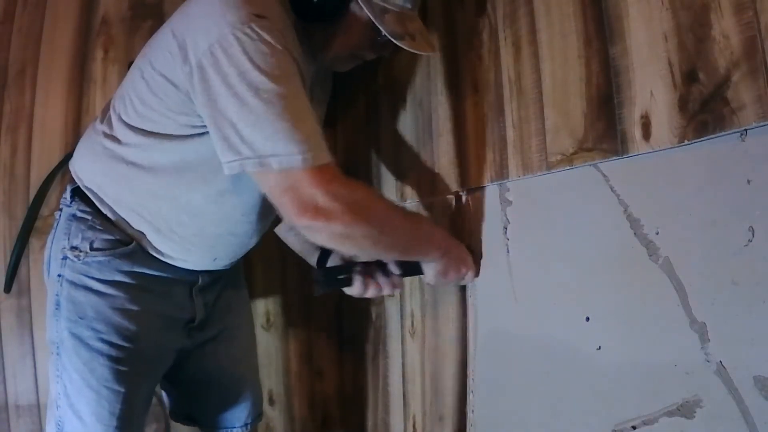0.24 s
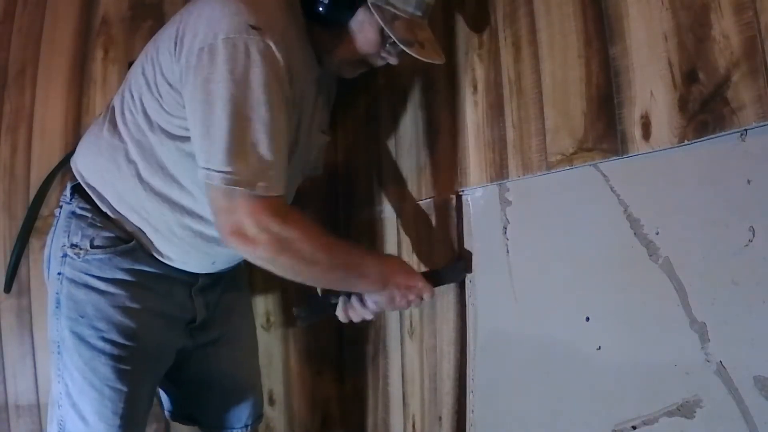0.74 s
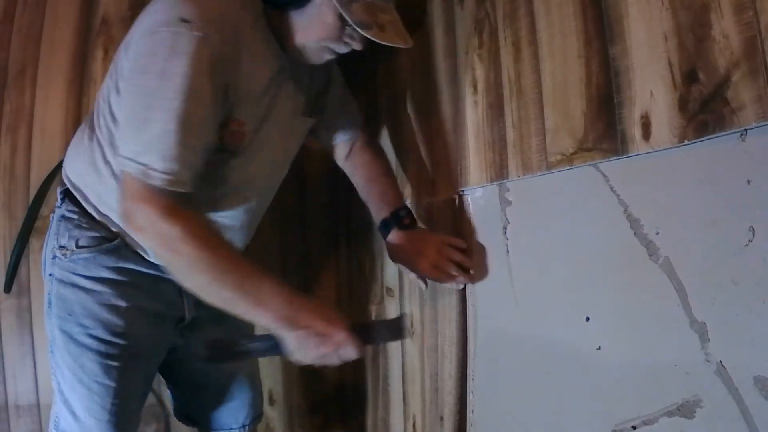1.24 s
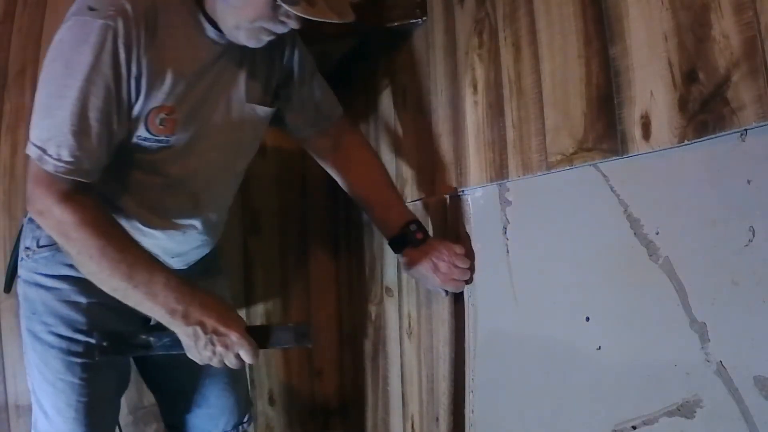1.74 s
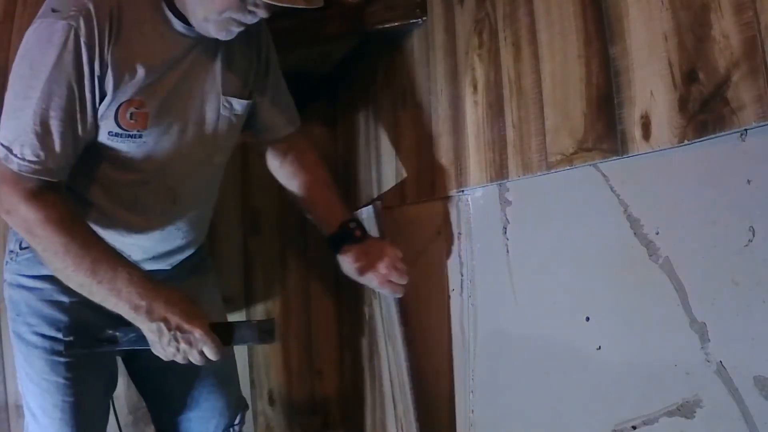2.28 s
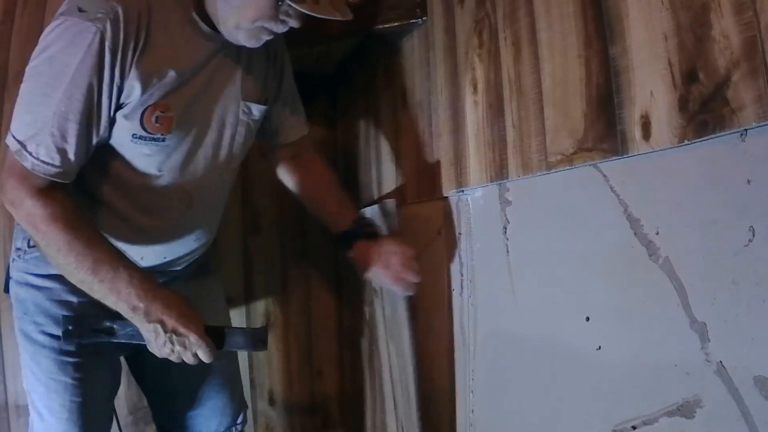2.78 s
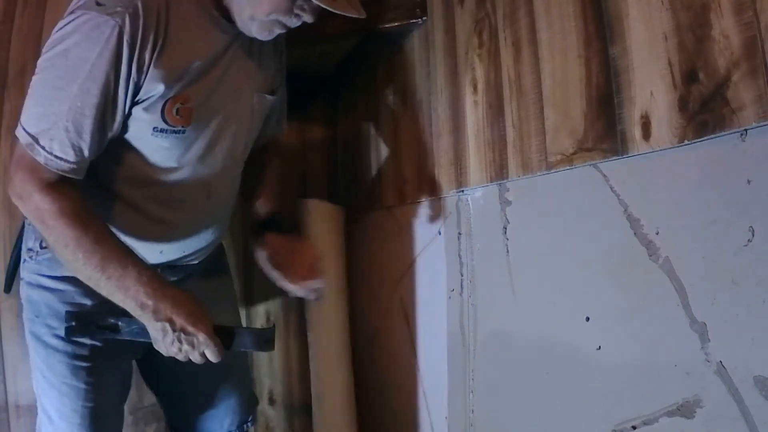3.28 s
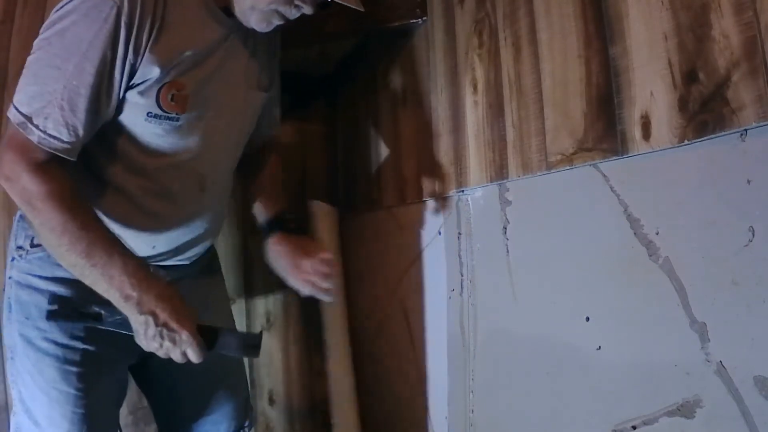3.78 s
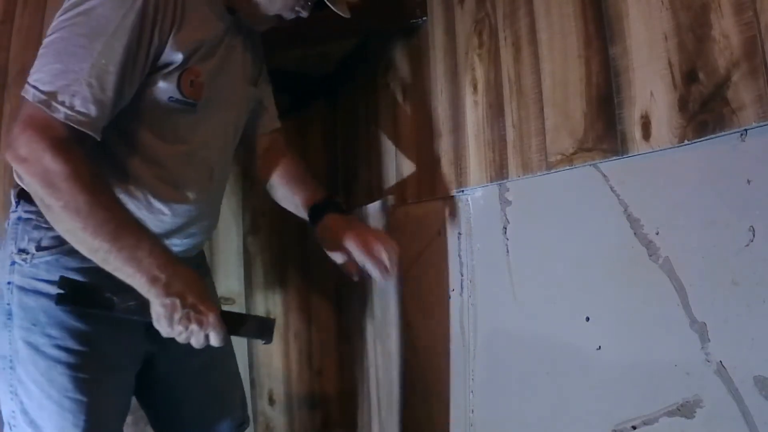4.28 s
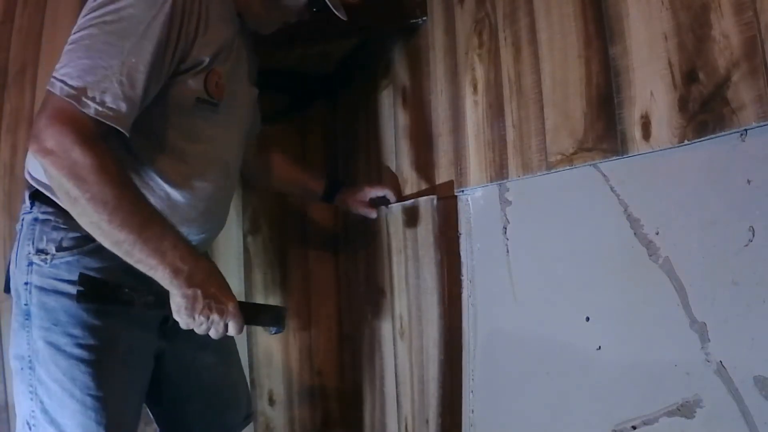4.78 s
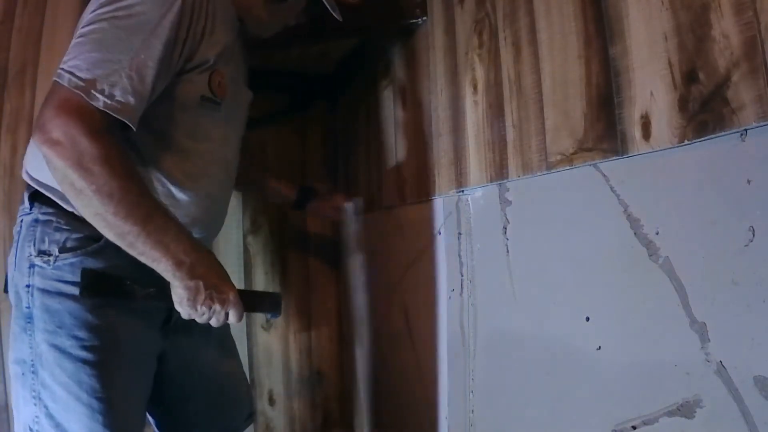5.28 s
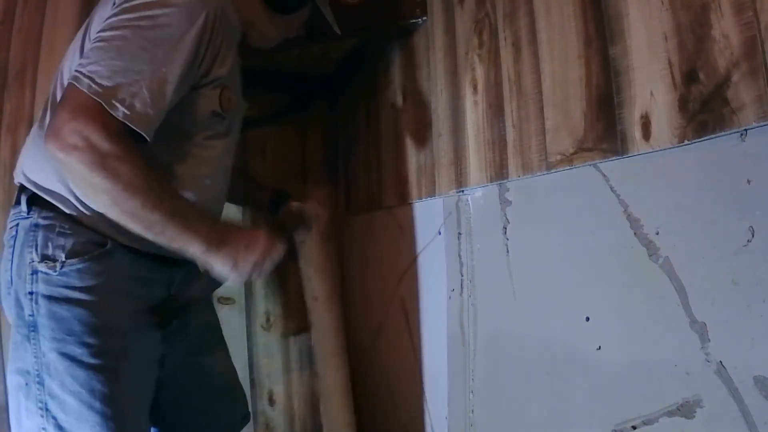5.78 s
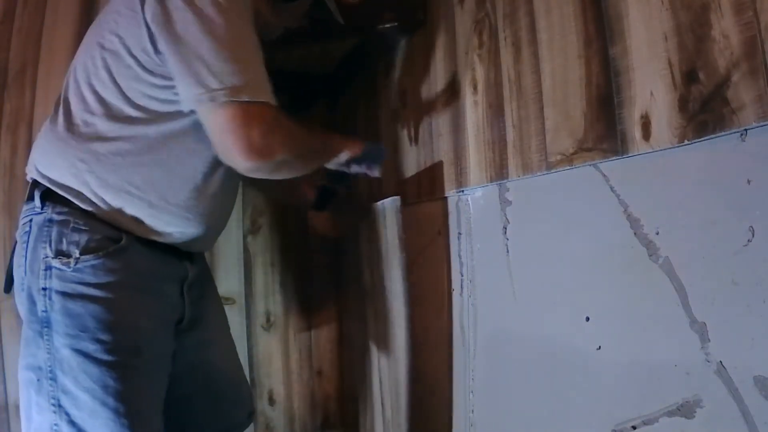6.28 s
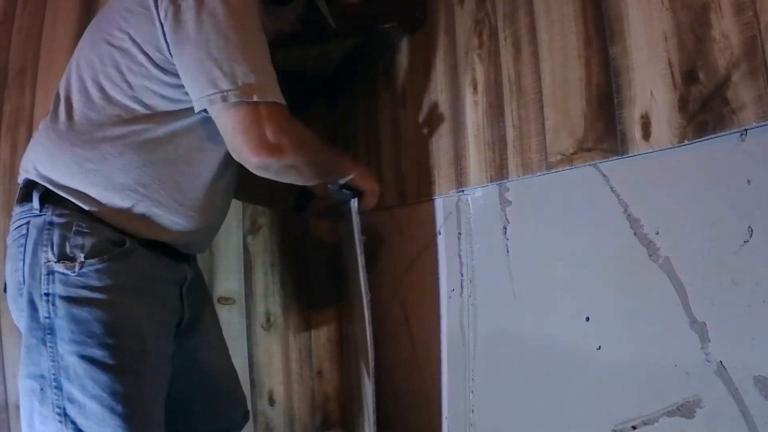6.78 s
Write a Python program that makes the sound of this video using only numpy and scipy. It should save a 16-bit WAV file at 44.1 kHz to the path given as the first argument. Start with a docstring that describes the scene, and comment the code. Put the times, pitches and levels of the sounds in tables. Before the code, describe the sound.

Drywall and a wooden strip are pried off a basement wall: sharp cracks, two huge hollow booms, then knocks, ticks and faint scrapes.

```python
"""A sheet of drywall and its wooden strip are levered, then pulled by hand, off a basement wall.
Each time a nail or the gypsum gives way, decaying bending modes boom and banded noise cracks in a small room.
The sheet also rattles, knocks and crunches, and the wood snaps: the same board, wood and sheet, struck differently.
Between pulls the edge scrapes (trains of tiny slips), grit clicks (noise bursts) and a steel bar rings (modes).
Quiet room noise lies below; the hardest cracks overload the microphone."""
import sys
import numpy as np
from scipy import signal
from scipy.fft import rfft, irfft
from scipy.io import wavfile

SR = 44100
rng = np.random.default_rng(int(sys.argv[2]) if len(sys.argv) > 2 else 0)


def waveform_to_disk(signal):
    """Save audio, clipped to [-1, 1], as 16-bit WAV at the path in sys.argv[1]."""
    frames = np.transpose(np.atleast_2d(signal))
    scaled = np.clip(frames, -1, 1) * 32767
    samples = np.round(scaled).astype(np.int16)
    wavfile.write(sys.argv[1], SR, samples)


N = 310208
RING = int(.6 * SR)  # samples in one ringing hit
ATTACK = int(.03 * SR)  # samples over which a hit's level is set
AGE_S = np.arange(RING) / SR
TIME_S = np.arange(N) / SR


def undb(db):
    """Decibels to gain."""
    return 10 ** (np.asarray(db) / 20)


def read(points, hz):
    """Value of (Hz, value) points on a log-frequency axis."""
    point_hz, value = np.transpose(points)
    return np.interp(np.log(np.maximum(hz, 1)), np.log(point_hz), value)


def colour(x, points):
    """Filter x by (Hz, dB) points, then scale to rms 1."""
    gain = undb(read(points, np.fft.rfftfreq(len(x), 1 / SR)))
    y = irfft(rfft(x) * gain, len(x))
    return y / y.std()


def fade(t60_s):
    """Exponential decay, 60 dB down after t60_s."""
    return np.exp(-np.log(1000) * AGE_S / t60_s)


def onset(rise_s):
    """A push builds up smoothly, with time constant rise_s."""
    return 1 - np.exp(-AGE_S / rise_s) * (1 + AGE_S / rise_s)


def unit(x):
    """Scale a hit to rms 1 over its attack."""
    return x / np.sqrt(np.mean(x[..., :ATTACK] ** 2, axis=-1, keepdims=True))


def walk(points_per_s, size):
    """Random wander around 0, straight lines between normal draws."""
    steps = np.arange(size) * points_per_s / SR
    count = int(steps[-1]) + 2
    return 1.02 * np.interp(steps, np.arange(count), rng.standard_normal(count))


def add(out, start_s, x):
    """Mix x into out at start_s."""
    i = max(int(start_s * SR), 0)
    out[i:i + len(x)] += x[:N - i]


# Every hit list below holds: start s, level dB, rise ms, then thump, crack and splinter dB relative to level,
# then a list of ringing spans (lowest mode Hz, dB relative to level).

BAR_OUT_S, BAR_THUMP_DB = 0.92, 5.5  # until then the bar in the wall bears on the studs with every push
REBOUND_S, REBOUND_DB = 0.028, -8.5  # the sheet springs back after a break
# A nail or the gypsum gives way. Each row: start in seconds, level in dB, rise in ms, hardness in dB and
# sheet ring in dB (both relative to level), lowest mode of the freed span in Hz.
BREAKS = [ (0.0423, -26, 0.6, -5, -2, 279), (0.219, -15, 4.6, 4, -2.5, 277.8),
          (0.243, -18, 1.1, 3, -4, 234.3), (0.287, -19, 2, 3.5, -0.5, 1088),
          (0.299, -21, 0.41, 7.5, -2, 532.4), (0.855, -40, 9.2, -2.5, 8.5, 334.7),
          (1.888, -32, 2.2, 6.5, -4, 897), (1.907, -18.5, 0.86, -0.5, -6, 334),
          (1.949, -27.5, 0.36, -1, 2, 833), (3.147, -19, 3, -5.5, -5.5, 233),
          (3.196, -6.5, 0.5, -0.5, 11, 269.1), (3.276, -7, 2.3, -4.5, -6, 267.7),
          (3.304, -18, 0.8, 6.5, -6.5, 274), ]


def breaks(thump_db=-6, splinter_db=-6, rebound_share=0.43, rebound_rise_ms=2.1,
           rebound_crack_db=-16, rebound_splinter_db=-20, rebound_ring_db=-1):
    """A break is a blow that sets the freed span ringing; the wider it swings, the harder its dull rebound."""
    hits = []
    for s, db, rise_ms, hard_db, ring_db, hz in BREAKS:
        push_db = thump_db + BAR_THUMP_DB * (s < BAR_OUT_S)
        hits.append((s, db, rise_ms, push_db, hard_db, hard_db + splinter_db, [(hz, ring_db)]))
        rebound_db = db + REBOUND_DB + rebound_share * ring_db
        hits.append((s + REBOUND_S, rebound_db, rebound_rise_ms, push_db,
                     rebound_crack_db, rebound_splinter_db, [(hz, rebound_ring_db)]))
    return hits


def rattles(above_db=-12, delay_s=0.17, gap_s=0.045, uneven_s=0.01225, level_db=-40, loss_db=11, count=4,
            rise_ms=4, thump_db=9, crack_db=-11, splinter_db=-12, ring_db=9, span_hz=240):
    """The sheet settles after a break above above_db in soft bumps, each weaker than the last."""
    hits = []
    for s, db, *_ in BREAKS:
        if db <= above_db:
            continue
        for k in range(count):
            bump_s = s + delay_s + k * gap_s + uneven_s * rng.standard_normal()
            bump_db = db + level_db - k * loss_db
            hits.append((bump_s, bump_db, rise_ms, thump_db, crack_db, splinter_db, [(span_hz, ring_db)]))
    return hits


# The loose sheet knocks on a stud. Each row: start in seconds, level in dB, rise in ms, wall thump in dB and
# hardness in dB (both relative to level), lowest mode of the span beyond the stud in Hz.
KNOCKS = [ (0.666, -45, 2.6, 20.5, -12, 103), (1.141, -58, 2.8, 18, -2, 322),
          (3.135, -37.5, 3.8, 16.5, 7.5, 217), (3.634, -52.5, 2.8, 5.5, -33, 209),
          (3.853, -56, 9.3, -6, -4, 194), (4.378, -40, 0.67, -5.5, 8.5, 479),
          (5.237, -36.5, 2.1, 4.5, -10, 392), (5.828, -56, 2.4, 0, -7, 393),
          (6.428, -31.5, 9.9, -2, -7.5, 345.5), (6.534, -30.5, 8.6, -9, -19, 394),
          (6.673, -57, 2.2, -3, -8, 392), (6.818, -44.5, 11, 6.5, -15, 245), ]


def knocks(splinter_db=-12, sheet_hz=265.4, whole_ring_db=7, beyond_ring_db=6):
    """A knock frees no span: the whole loose sheet booms, and so does the span beyond the stud."""
    return [(s, db, rise_ms, thump_db, hard_db, hard_db + splinter_db,
             [(sheet_hz, whole_ring_db), (hz, beyond_ring_db)])
            for s, db, rise_ms, thump_db, hard_db, hz in KNOCKS]


# Gypsum crunches under a slow push. Each row: start in seconds, level in dB, rise in ms.
CRUNCHES = [(0.167, -43, 16), (0.842, -44, 9.3), (0.893, -45.5, 7.4), (1.245, -55, 2.3),
            (2.272, -45.5, 3.5), (2.438, -41, 9.5), (2.468, -43.5, 6.7), (6.793, -53, 13)]


def crunches(thump_db=-3, crack_db=4, splinter_db=-9, ring_hz=290, ring_db=-4):
    """Crushed gypsum swells, with much midrange and little treble."""
    return [(s, db, rise_ms, thump_db + BAR_THUMP_DB * (s < BAR_OUT_S), crack_db, splinter_db,
             [(ring_hz, ring_db)])
            for s, db, rise_ms in CRUNCHES]


# The wooden strip snaps or ticks. Each row: start in seconds, level in dB, hardness in dB relative to level,
# lowest mode of the stub in Hz.
SNAPS = [(0.934, -35, 2, 1270), (2.005, -52.5, 11, 900), (2.202, -43, 10.5, 1410), (2.511, -49, 13, 1786),
         (2.924, -51.5, 3, 905), (4.637, -50, 11.5, 1875), (5.31, -45.5, 7.5, 998),
         (5.673, -67.5, 20, 1820), (5.973, -53, 2, 946)]


def snaps(rise_ms=2.05, thump_db=-4, splinter_db=-10, splinter_growth=1.56, ring_db=0):
    """Snaps are light and quick and ring only a stub of sheet; the harder the snap, the more it splinters."""
    return [(s, db, rise_ms, thump_db, hard_db, splinter_db + splinter_growth * hard_db, [(hz, ring_db)])
            for s, db, hard_db, hz in SNAPS]


# Bending modes of the sheet, all scaled to the pitch of the ringing span.
# Each row: frequency in Hz, level in dB, t60 in seconds, at a lowest mode of the first row's frequency.
SHEET_MODES = [(270, 0, .23), (292, -11, .26), (388, -11, .26), (452, -14, .25), (512, -8, .17),
               (712, -18, .22), (925, -19, .16), (1290, -26, .14), (1690, -32, .12)]


def boom(pitch_hz, rise_s, contact, swing_s=0.0017, scatter_db=2.0, first_t60_s=0.045, linger=0.27,
         radiate_hz=2200, stub_damping=0.48):
    """The free span swings into its bending modes, higher if short; the first wide swing dies fast."""
    hz, db, t60_s = np.transpose(SHEET_MODES)[:, :, None]
    weight, detune, phase = rng.standard_normal((3, len(hz), 1))
    t60_s = t60_s * (hz[0] / pitch_hz) ** stub_damping  # short spans die sooner
    hz = hz * pitch_hz / hz[0] * (1 + 0.0036 * detune)
    # a soft contact leaves the upper modes quiet, and gypsum swallows the highest
    size = undb(db + read(contact, hz) + scatter_db * weight) / (1 + (hz / radiate_hz) ** 2)
    modes = size * fade(t60_s) * np.sin(2 * np.pi * (hz * AGE_S + phase))
    swing = onset(rise_s + swing_s) * (fade(first_t60_s) + linger)
    return unit(modes.sum(axis=0) * swing)


BANDS_HZ = 35 * 2 ** (np.arange(18) / 2)


def board_bands(size=2 ** 17):
    """The board's countless close modes, as noise in overlapping half-octave bands."""
    spectrum = rfft(rng.standard_normal(size))
    hz = np.fft.rfftfreq(size, 1 / SR)
    distance = np.clip(2 * np.log2(np.maximum(hz, 1) / BANDS_HZ[:, None]), -1, 1)
    return irfft(spectrum * np.cos(np.pi / 2 * distance) ** 2, size)


# Dense ringing of gypsum and studs. Each row: frequency in Hz, relative band level in dB.
BOARD_COLOUR = [(35, -36), (70, -12), (140, -3.5), (280, -2), (560, -3), (900, 0.5), (1500, -7.5),
                (2260, -11), (3400, -15), (4800, -17), (8000, -19), (12500, -44.5)]
# Resonances of the strip and stud wall, shared by every blow.
# Each row: frequency in Hz, relative level in dB, t60 in seconds.
WOOD_MODES = [(78, -24, .3), (124, -11, .38), (140, -16, .28), (214, -10, .32), (464, -11, .25),
              (511, -6, .22), (678, -10, .22), (716, -7, .22), (800, -8, .1), (850, -7, .12),
              (930, -6, .18), (1062, -9, .18), (1105, -10, .16), (1271, -7, .18), (1350, -9, .18),
              (1432, -11, .16), (1510, -11, .15), (1580, -11, .16), (1722, -8, .17), (1805, -12, .16),
              (2108, -14, .16), (2180, -16, .18), (2612, -21, .16), (2715, -21, .11), (2880, -19, .16),
              (3080, -19, .08), (4050, -26, .12), (4400, -27, .12)]
# Decay of the basement. Each row: frequency in Hz, t60 in seconds.
ROOM_T60 = [(60, 0.28), (160, 0.36), (420, 0.3), (1100, 0.18), (2500, 0.25), (4000, 0.14), (8000, 0.17)]


def blows(hits, crumble_db=4, crumble_per_s=700, crumble_t60_s=0.22, board_db=-6, wood_db=-3, scatter_db=3.0,
          board_t60_s=0.022, treble_t60_s=0.014, room_db=-9, room_treble_db=-10.5):
    """Each blow rings board, wood and sheet, and the room for longer; crumbling makes the treble ragged."""
    out, bands = np.zeros(N), board_bands()
    # high modes of the board die sooner than low ones
    band_t60_s = read([(500, board_t60_s), (6000, treble_t60_s)], BANDS_HZ)[:, None]
    band_room_db = read([(700, room_db), (3500, room_treble_db)], BANDS_HZ)[:, None]
    room = undb(band_room_db) * fade(read(ROOM_T60, BANDS_HZ)[:, None])
    decay = fade(band_t60_s) + room
    ragged = np.clip(BANDS_HZ / 2500, 0, 1)[:, None]
    wood_hz, mode_db, wood_t60_s = np.transpose(WOOD_MODES)
    wood_rings = fade(wood_t60_s[:, None]) * np.exp(2j * np.pi * wood_hz[:, None] * AGE_S)
    for s, db, rise_ms, thump_db, crack_db, splinter_db, spans in hits:
        rise_s = max(rise_ms, .1) / 2000  # time constant: half the listed rise
        start = int(rng.random() * (bands.shape[1] - RING))
        crumbs = undb(crumble_db * walk(crumble_per_s, RING) * fade(crumble_t60_s)) - 1
        ring = unit(bands[:, start:start + RING] * decay * onset(rise_s) * (1 + ragged * crumbs))
        # a heavy push moves the wall, a sudden break adds the highs
        contact = [(100, db + thump_db), (450, db), (1600, db + crack_db), (6000, db + splinter_db)]
        board = undb(board_db + read(BOARD_COLOUR, BANDS_HZ) + read(contact, BANDS_HZ)) @ ring
        # each place of impact weights the wood's modes anew
        weight, phase = rng.standard_normal((2, len(wood_hz)))
        drive_db = wood_db + mode_db + read(contact, wood_hz) + scatter_db * weight
        drive = undb(drive_db) * np.exp(2j * np.pi * phase)
        wood = (drive @ wood_rings).imag * onset(rise_s)
        sheet = sum(undb(db + ring_db) * boom(hz, rise_s, contact) for hz, ring_db in spans)
        add(out, s, board + wood + sheet)
    return out


# Spectrum of snapping fibres. Each row: frequency in Hz, relative level in dB per Hz.
SPLINTER_COLOUR = [(900, 18), (2000, 5), (4500, -3), (8000, -4), (12500, -22)]


def splinters(count=3, level_db=-4, gap_s=0.0049, loss_db=4, t60_s=0.0034, delay_rises=1.2):
    """Just after each break starts, a few fibres snap in quick succession, each weaker than the last."""
    out = np.zeros(N)
    all_gaps = rng.exponential(size=(len(BREAKS), count))
    for (s, db, rise_ms, hard_db, *_), gaps in zip(BREAKS, all_gaps):
        first_s = s + delay_rises * rise_ms / 1000
        for k, after_s in enumerate(gap_s * (np.cumsum(gaps) - gaps[0])):
            click = colour(rng.standard_normal(ATTACK), SPLINTER_COLOUR) * fade(t60_s)[:ATTACK]
            add(out, first_s + after_s, undb(db + hard_db + level_db - k * loss_db) * click)
    return out


# The loose edge rubs along the studs and creaks faintly.
# Each row: middle in seconds, half length (Gaussian sigma) in seconds, level in dB.
SCRAPES = [(0.761, 0.041, -46.5), (1.794, 0.044, -54.5), (2.103, 0.0077, -50), (2.19, 0.019, -47.5),
           (2.383, 0.034, -51), (4.216, 0.033, -47), (4.766, 0.015, -53), (4.92, 0.066, -48.5)]
# Spectrum of the rubbing. Each row: frequency in Hz, relative level in dB per Hz.
RUB_COLOUR = [(60, 5), (300, 15.5), (900, 5), (1500, 5), (3000, -13), (10000, -32.5)]


def scrapes(slips_per_s=2000, slip_db=4, smear_t60_s=0.06, creak_db=-6, hoarse_per_s=220, second_ratio=0.58,
            creak_hz=842, spread_octaves=0.22, glide_octaves_per_s=2.3):
    """Many tiny slips of the edge on the wood, smeared by the board, with two hoarse gliding creak tones."""
    slips = (rng.random(N) < slips_per_s / SR) * rng.standard_normal(N)
    slips = slips * undb(slip_db * rng.standard_normal(N))
    smear = rng.standard_normal(RING) * fade(smear_t60_s)
    rubbed = colour(signal.fftconvolve(slips, smear)[:N], RUB_COLOUR)
    hoarse_first, hoarse_second = walk(hoarse_per_s, N), walk(hoarse_per_s, N)
    out = np.zeros(N)
    for (s, half_s, db), (high, rising) in zip(SCRAPES, rng.standard_normal((len(SCRAPES), 2))):
        near = np.abs(TIME_S - s) < 4 * half_s
        t = TIME_S[near] - s
        hz = creak_hz * 2 ** (spread_octaves * high + glide_octaves_per_s * rising * t)
        phase = 2 * np.pi * np.cumsum(hz) / SR
        creak = hoarse_first[near] * np.sin(phase) + hoarse_second[near] * np.sin(second_ratio * phase)
        swell = np.exp(-.5 * (t / half_s) ** 2)
        out[near] += undb(db) * swell * (rubbed[near] + undb(creak_db) * creak)
    return out


# Bits of grit click on the wood. Each row: start in seconds, level in dB.
GRIT = [(2.167, -67), (2.358, -68), (2.936, -65.5), (5.295, -61), (5.311, -52), (6.24, -71)]
# Spectrum of a click. Each row: frequency in Hz, relative level in dB per Hz.
GRIT_COLOUR = [(2000, -29), (5500, -12), (6500, -3), (7100, -1), (7900, -9), (12500, -22)]


def grit(t60_s=0.018, room_db=-13, room_t60_s=.25):
    """Small hard crumbs give bright clicks with a short trail of room."""
    out = np.zeros(N)
    decay = fade(t60_s) + undb(room_db) * fade(room_t60_s)
    for s, db in GRIT:
        click = colour(rng.standard_normal(RING), GRIT_COLOUR) * decay
        add(out, s, undb(db) * unit(click))
    return out


# Modes of the steel bar. Each row: frequency in Hz, relative level in dB, t60 in seconds.
BAR_MODES = [(1720, 9, 0.1), (1870, -5, 0.39), (2680, -10, .3), (4600, -21, .15)]


def bar(touch_s=6.430, level_db=-47.5):
    """The steel bar touches the strip and rings faintly in the hand, as a few decaying modes."""
    ring = sum(undb(db) * fade(t60_s) * np.sin(2 * np.pi * hz * AGE_S) for hz, db, t60_s in BAR_MODES)
    out = np.zeros(N)
    add(out, touch_s, undb(level_db) * unit(ring))
    return out


# Spectrum of the room noise. Each row: frequency in Hz, relative level in dB per Hz.
AIR_COLOUR = [(18, -55), (30, -35), (62, -11.5), (155, -4), (330, -3.5), (394, -6.5), (458, -7.5),
              (520, -7), (561, -10.5), (861, -11), (1200, -16), (1700, -18.5), (4010, -29.5),
              (12500, -35.5), (16200, -69), (22000, -120)]


def air(level_db=-53, waver_db=1, waver_per_s=27, low_hz=1500):
    """Quiet room noise whose low part wavers a little under an even hiss."""
    noise = colour(rng.standard_normal(N), AIR_COLOUR)
    low = signal.sosfilt(signal.butter(1, low_hz, fs=SR, output="sos"), noise)
    waver = undb(waver_db * walk(waver_per_s, N)) - 1
    return undb(level_db) * (noise + low * waver)


def scene():
    """Everything at one microphone."""
    hits = breaks() + rattles() + knocks() + crunches() + snaps()
    return (blows(hits) + splinters() + scrapes() + grit() + bar() + air())[None]


def record(dry, ceiling=.405, knee=10, top_hz=12900):
    """The input flattens the loudest swings towards the ceiling, then the top is cut."""
    clipped = dry / (1 + np.abs(dry / ceiling) ** knee) ** (1 / knee)
    return signal.sosfilt(signal.ellip(10, .1, 80, top_hz, fs=SR, output="sos"), clipped)


dry = scene()
out = record(dry)
waveform_to_disk(out)
```